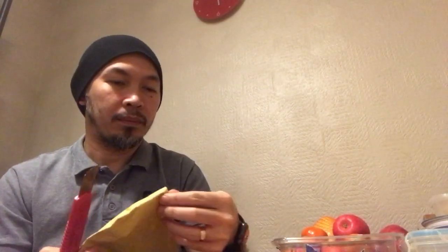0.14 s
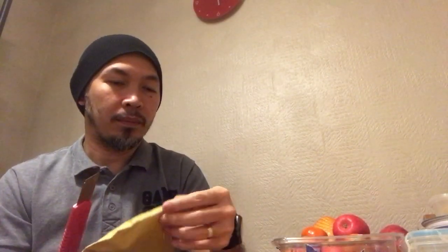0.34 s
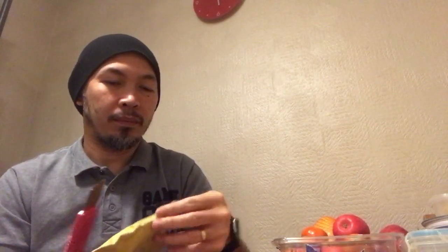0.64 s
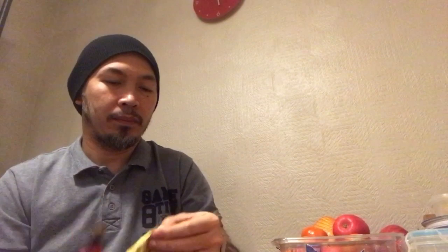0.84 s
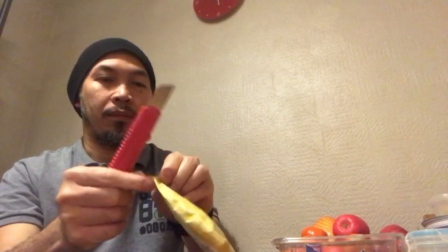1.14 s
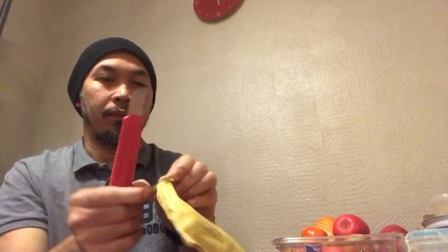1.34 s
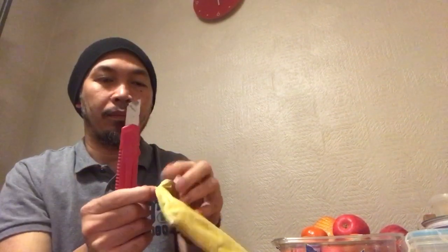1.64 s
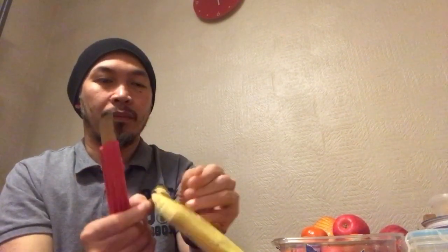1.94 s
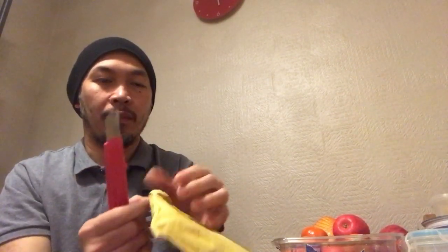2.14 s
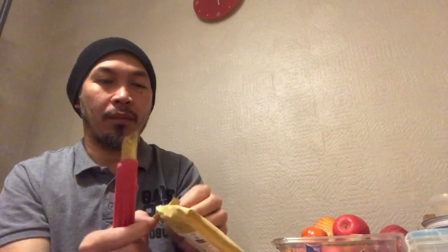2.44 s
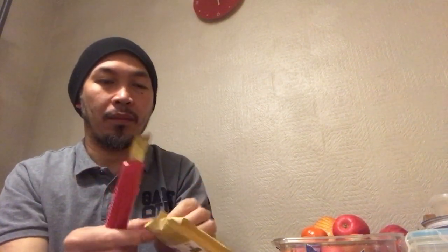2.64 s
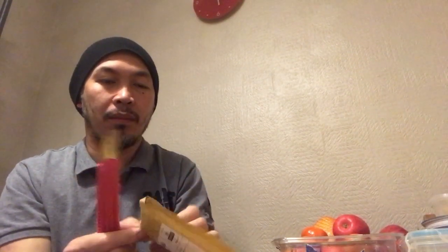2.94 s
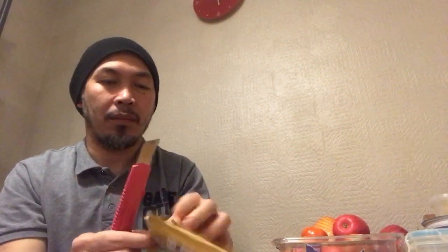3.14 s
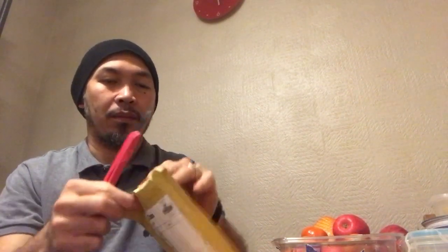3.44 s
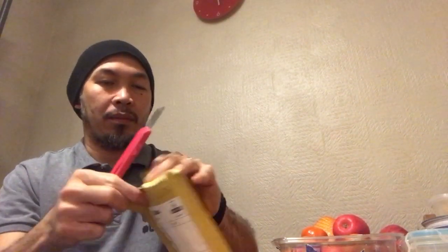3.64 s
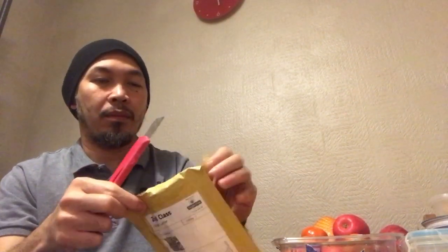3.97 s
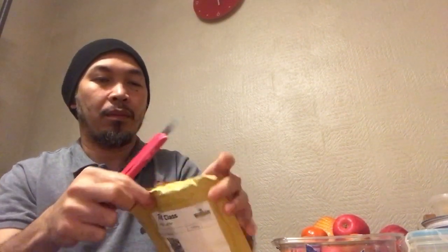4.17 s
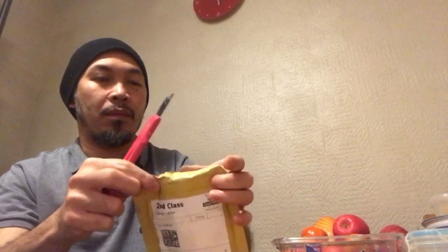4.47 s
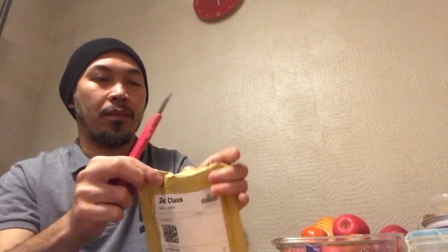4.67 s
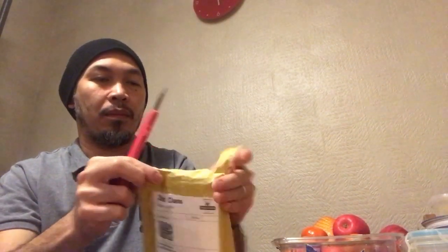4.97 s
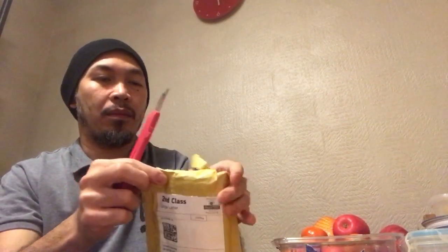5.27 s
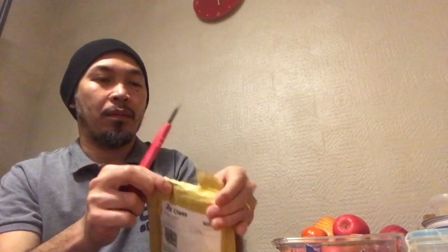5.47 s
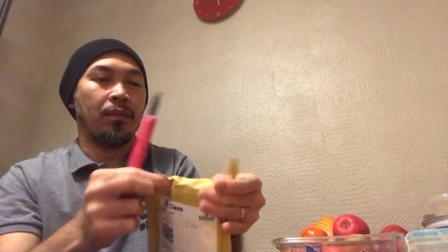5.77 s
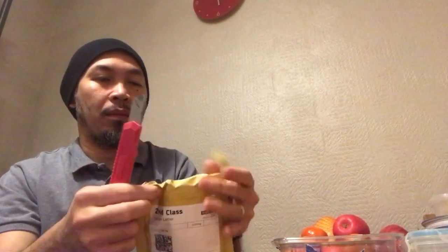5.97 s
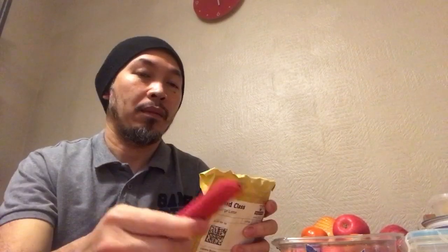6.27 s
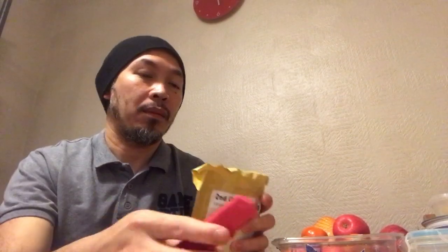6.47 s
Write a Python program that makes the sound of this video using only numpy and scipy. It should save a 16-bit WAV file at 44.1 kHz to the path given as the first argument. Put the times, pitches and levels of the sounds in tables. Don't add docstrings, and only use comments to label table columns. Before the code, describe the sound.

A padded paper envelope is handled and torn open very close to a laptop microphone in a small, quiet furnished room with a short echo and low steady hush. From 0 to 0.5 s there are light rustles and small folds, then a crisp cluster at 0.6-0.95 s. Between 1.1 and 1.45 s creases snap while plastic lining ticks very high; another bright burst comes at 1.75-1.95 s. Sparse, softer crinkles follow until duller crackling at 2.6-2.9 s and folds with table thuds at 3.1-3.4 s. The hardest tearing rips at 3.65-3.95 s, loud enough to clip. After gentler rustling, dense snaps and thumps build at 4.4-5.1 s, peaking near 4.8 s. Irregular cracks continue around 5.5 and 5.85 s. At 6.2 s everything cuts abruptly, leaving near quiet and a few light crinkles around 6.3-6.4 s.

```python
import sys
import numpy as np
from scipy import signal
from scipy.fft import rfft, irfft, next_fast_len
from scipy.io import wavfile
from scipy.ndimage import uniform_filter1d, map_coordinates

SR = 44100
rng = np.random.default_rng(int(sys.argv[2]) if len(sys.argv) > 2 else 0)


def waveform_to_disk(signal):
    frames = np.transpose(np.atleast_2d(signal))
    scaled = np.clip(frames, -1, 1) * 32767
    samples = np.round(scaled).astype(np.int16)
    wavfile.write(sys.argv[1], SR, samples)


def ratio(d):
    e = np.asarray(d, float) / 20
    return 10 ** e


N = 291573
T = np.arange(N) / SR
SCENE_CHANGE_S = 6.211

# frequency in Hz, level in dB per Hz.
HUSH_COLOUR = [(18, -43), (30, -7), (109, -2), (174, -5.5), (239, -5), (913, -16.5), (3670, -17.5),
               (3980, -23.5), (4910, -20.5), (16000, -45)]
# frequency in Hz, level in dB per Hz.
WOOD_COLOUR = [(25, -54), (45, -3.5), (80, 4.5), (130, 1.5), (250, -7.5), (500, -39)]
# frequency in Hz, level in dB per Hz.
POCKET_COLOUR = [(120, -40.5), (260, -2), (370, 5), (520, -1.5), (900, -35.5)]
# frequency in Hz, gain in dB.
MIC_RESPONSE = [(30, -53.5), (150, -24.5), (720, -3.5), (1250, 0.5), (1900, -0.5), (2300, 1), (3000, -2),
                (3900, 0), (4900, -4.5), (6400, -6), (9600, -13), (10400, -14.5), (11800, -10.5),
                (15750, -13.5)]
# frequency in Hz, t60 in seconds.
ROOM_DECAY = [(200, 0.38), (1000, 0.022), (4000, 0.08), (14000, 0.096)]
# start in seconds, hold in seconds, level in dB.
TABLE_LEANS = [
    (1.93, 0.031, -42),
    (3.14, 0.04, -44),
    (3.47, 0.18, -43.5),
    (4.42, 0.065, -54),
    (4.7, 0.36, -43.5),
    (5.2, 0.08, -62),
    (5.75, 0.034, -41.5),
]
# start in seconds, peak in dB, pitch in Hz, t60 in seconds.
TABLE_THUMPS = [(0.523, -38.5, 380, 0.15), (0.9, -22.5, 387, 0.038), (1.128, -24, 277, 0.034),
                (1.311, -24, 668, 0.079), (1.936, -22, 522, 0.043), (3.145, -20, 632, 0.089),
                (3.263, -19.5, 516, 0.048), (4.169, -20, 620, 0.073), (4.433, -30.5, 141, 0.078),
                (4.822, -5.5, 384, 0.037), (4.979, -27, 336, 0.085), (5.826, -22, 300, 0.024),
                (5.843, -20, 300, 0.029), (5.864, -15, 400, 0.028), (5.978, -18.5, 318, 0.019),
                (6.188, -25.5, 77.5, 0.071)]
# time in seconds, steady handling in dB, brightness in dB.
STEADY_HANDLING = [(0.0, -48.5, -9), (.25, -53, -9), (.55, -45.5, -8), (.8, -30.5, -5.5), (1.03, -41.5, -6),
                   (1.25, -34.5, 8), (1.5, -38.5, -6), (1.75, -42, -1.5), (2.14, -48, -9), (2.5, -35, -14),
                   (3.04, -33.5, -7.5), (3.5, -30, -21.5), (4.0, -38, -10), (4.55, -28.5, -10),
                   (5.0, -39, 5), (5.2, -38.5, -14), (5.45, -34, -7), (6.2, -35, -9.5)]
# level in dB, brightness in dB.
LATE_HANDLING = (-75, -5)
# start in seconds, hold in seconds, level in dB, brightness in dB.
SHEET_PULLS = [(.35, 0.046, -29.5, -5), (.74, 0.017, -34, -15), (1.2, 0.12, -45, 15.5),
               (1.3, 0.099, -27.5, -9), (1.8, 0.097, -22, -0.5), (1.92, 0.033, -23, -8),
               (2.29, 0.02, -33.5, -10.5), (2.46, 0.018, -33, -5.5), (2.75, 0.056, -21.5, -2.5),
               (2.875, 0.1, -24.5, -7.5), (3.69, 0.047, -8.5, -6), (3.86, 0.087, -12, -9),
               (3.855, 0.118, -38, 9), (4.62, 0.072, -19.5, -8.5), (4.73, 0.025, -17, -13.5),
               (4.94, 0.041, -18.5, -13.5), (5.04, 0.046, -33, -4.5), (5.5, 0.13, -21, -17),
               (6.335, 0.049, -34.5, -3.5), (6.24, 0.07, -52, 0), (6.47, 0.084, -47, -10),
               (.29, 0.03, -41.5, -5), (1.14, .04, -40, -12), (3.79, 0.014, -43.5, 10),
               (4.175, 0.017, -27.5, -5), (4.065, 0.05, -40.5, 5.5), (5.55, 0.054, -30, -2),
               (.02, .06, -62, 10), (.47, .04, -57, 12), (.68, .025, -60, 12), (3.74, .033, -39, 16),
               (3.93, 0.034, -39, 15), (5.36, .04, -58, 12), (5.545, .115, -50, 14), (5.74, .045, -54, 12),
               (5.945, 0.021, -56, 17), (6.0, .05, -58, 14), (6.5, .06, -66, 8), (.05, 0.11, -47.5, -7),
               (.6, 0.13, -40, -12)]
# start in seconds, hold in seconds, level in dB, brightness in dB.
PADDING_SQUEEZES = [(.588, 0.043, -36, -41), (.874, 0.055, -31, -19), (1.125, 0.056, -23.5, -30),
                    (1.553, 0.11, -30, -24), (1.635, 0.034, -87, -50), (2.212, 0.041, -34.5, -10),
                    (2.572, 0.091, -31, -21), (3.14, 0.025, -25.5, -8), (3.225, 0.084, -27.5, -13),
                    (3.378, 0.18, -36.5, -4.5), (3.645, 0.09, -12.5, -13.5), (3.72, 0.035, -17, -29),
                    (4.078, 0.083, -26.5, -24), (4.4, 0.062, -25.5, -13), (4.775, 0.01, -15, -9),
                    (4.823, 0.0057, -7, -19.5), (5.293, 0.097, -25, -12.5), (5.686, 0.0052, -18.5, -29),
                    (5.73, 0.053, -23, -11.5), (5.828, 0.017, -18, -19), (5.976, 0.089, -37, -30),
                    (6.057, 0.062, -29, -9.5), (6.188, .03, -21, -16), (6.4, 0.03, -35, -19)]
# start in seconds, peak in dB, pitch in Hz.
LINING_TICKS = [(0.748, -27, 11900), (0.754, -39, 11000), (0.835, -34, 12810), (1.0, -32, 13890),
                (1.164, -27, 13500), (1.173, -19, 10960), (1.201, -18, 12940), (1.214, -15, 10900),
                (1.224, -15, 9220), (1.233, -17, 11900), (1.252, -24, 12380), (1.256, -29, 9110),
                (1.265, -24, 9630), (1.276, -25, 9200), (1.288, -17, 12300), (1.295, -17, 12300),
                (1.306, -13, 14400), (1.326, -10, 12960), (1.349, -22, 11900), (1.369, -25, 13980),
                (1.375, -22, 11200), (1.381, -18, 12960), (1.386, -24, 12200), (1.396, -18, 11520),
                (1.401, -25, 11500), (1.41, -25, 12700), (1.417, -24, 14600), (1.812, -15, 15300),
                (1.82, -7, 15000), (1.83, -2, 14300), (1.843, -16, 12960), (1.865, -7, 11930),
                (1.882, -20, 13100), (1.941, -32, 13480), (2.666, -23, 14000), (3.234, -38, 9020),
                (3.268, -34, 8700), (3.657, -10, 11000), (3.836, -26, 13110), (4.067, -23, 9800),
                (4.09, -25, 11800), (4.131, -31, 13200), (4.175, -25, 12270), (4.183, -24, 12900),
                (4.192, -29, 14060), (4.444, -27, 11740), (4.491, -30, 12170), (4.635, -18, 9020),
                (4.643, -16, 9540), (4.737, -18, 11000), (4.79, -21, 10160), (4.823, -6.5, 9850),
                (4.847, -17, 9500), (4.957, -18, 13200), (4.98, -10, 9400), (5.005, -22, 11100),
                (6.058, -26, 9930), (6.067, -29, 11910), (6.353, -39, 11700), (6.539, -43, 8810)]
# start in seconds, peak in dB, panel pitch in Hz.
DULL_FOLDS = [(.009, -18.5, 1430), (.53, -23.5, 1090), (0.747, -3.5, 1890), (1.311, 6, 1510),
              (1.443, -13, 1610), (1.934, -6, 1300), (2.296, -16.5, 2570), (2.35, -17, 1300),
              (2.394, -14.5, 1740), (2.45, -23, 1320), (2.957, -14, 2140), (3.442, -14.5, 1410),
              (3.538, -14, 870), (4.126, -15.5, 910), (4.846, 4, 940), (4.911, -4.5, 1190),
              (4.946, -14, 1120), (5.05, -13.5, 1260), (5.229, -20, 2470), (5.499, 1.5, 1730),
              (5.524, -12, 1410), (5.534, -8.5, 4210), (5.687, -11, 2400), (5.829, -10, 1130),
              (5.845, -15.5, 1110), (5.865, -6.5, 1230), (5.976, -5.5, 1260), (6.057, -8, 1460),
              (6.089, -11.5, 1350), (6.201, -1.5, 1280)]
# start in seconds, peak in dB, panel pitch in Hz, crack in dB.
SHARP_CRACKS = [(.293, -27, 1400, -20), (0.357, -21, 1650, -21), (0.992, -16, 960, -27),
                (1.08, -17.5, 1820, -5), (1.126, -3.5, 1660, -4), (1.197, -20, 1070, -7),
                (1.35, -5.5, 1500, -20), (1.641, -8.5, 1400, -13), (1.755, -17.5, 1400, -29),
                (1.9, -1.5, 1410, -16), (3.65, -13, 1340, -19), (3.691, 5.5, 1420, -11),
                (3.718, -6, 1260, -17), (4.274, -20, 1010, -15), (4.44, -12.5, 2080, -21),
                (4.467, -10.5, 1270, -22), (4.576, -12, 1160, -9.5), (4.615, -14, 1210, -5),
                (4.65, -6, 1090, -18), (4.679, 2.5, 2250, -18.5), (4.741, -10, 1230, -20),
                (4.774, 1, 1430, -11.5), (4.792, 1, 1050, -25), (4.976, -4, 1330, -9),
                (5.075, -30.5, 1560, 9.5), (5.092, -9, 1000, -17), (5.293, -8, 3070, -12.5),
                (5.384, -26, 1570, -21), (5.547, -8, 1390, -10), (5.564, -7.5, 1260, -15)]
# start in seconds, peak in dB, panel pitch in Hz, crack in dB.
SHEET_RATTLES = [(.601, -14.5, 2420, -5), (0.754, -6, 2250, -10), (.78, -7.5, 2320, -4.5),
                 (0.784, -8, 3770, -8), (.873, -4, 2080, -2.5), (0.914, -6, 5500, -5.5),
                 (1.412, -14.5, 1860, -19), (1.554, -21, 2200, -7), (1.786, -17, 1410, -27),
                 (1.795, -3, 1740, -6), (1.827, -9.5, 1420, -7), (1.853, -4, 2400, 1.5),
                 (2.573, -20, 2050, -36), (2.658, -17.5, 1020, -18), (2.748, -14, 1080, -23),
                 (2.778, -6.5, 1640, -29), (2.873, -7.5, 1870, -36), (2.905, -7, 1650, -27),
                 (3.144, -0.5, 2520, -35), (3.224, -11.5, 1450, -40), (3.267, -8.5, 1410, -36),
                 (3.378, -20, 1700, -20), (3.453, -13, 1750, -35), (4.081, -14, 1250, -10),
                 (4.167, -15, 2300, -19), (4.496, -10.5, 2040, -5.5), (4.821, -5, 1280, -6),
                 (5.18, -27.5, 3200, -6), (5.318, -16.5, 1220, -29), (6.333, -11, 2400, -3)]
# start in seconds, peak in dB, panel pitch in Hz, crack in dB.
SMALL_TICKS = [(0.013, -19.5, 2650, -28), (0.586, -24, 3970, -21), (0.727, -27, 1250, -2),
               (.835, -27, 3970, -6), (1.004, -25, 2540, -17), (1.116, -12.5, 1780, -26),
               (1.287, -24, 1100, -15), (1.528, -42, 2160, -19), (1.821, -7, 1450, -22),
               (1.866, -5.5, 1480, -12), (2.162, -36, 1520, -19), (2.725, -13.5, 1150, -13),
               (3.099, -19, 1440, -26), (3.137, -5.5, 2380, -31), (3.153, -10, 1980, -25),
               (3.339, -16, 1980, -18), (3.674, -7, 1230, -18), (3.852, -35, 1300, -17),
               (3.886, -10, 1260, -37), (4.039, -20, 2220, -15), (5.042, -17.5, 1180, -24),
               (5.478, -11, 1070, -33), (5.621, -17, 1390, -18), (5.733, -21, 1350, -24),
               (6.189, -21, 1030, -26), (6.291, -27, 2700, -13), (6.312, -24, 2340, -13),
               (6.353, -13, 2290, -5), (6.372, -15.5, 2550, -34), (6.393, -22, 2370, -26)]
# start in seconds, peak in dB, panel pitch in Hz.
LESSER_CREASES = [(0.645, -38, 1800), (0.856, -27, 1460), (0.9, -12.5, 1030), (0.94, -21, 1270),
                  (1.164, -17, 970), (1.168, -12.5, 1980), (1.223, -15, 2480), (1.265, -19, 2540),
                  (1.289, -15, 1050), (1.315, -12, 1560), (1.325, -11.5, 1210), (1.799, -2.5, 2600),
                  (1.815, -25, 1810), (1.841, -5, 1320), (1.875, -7, 1410), (1.881, -6, 2640),
                  (1.891, -20, 1050), (1.95, -15, 1320), (3.204, -14, 6100), (3.233, -16, 1380),
                  (3.274, -14, 2500), (3.685, -17, 1100), (3.698, -2, 1370), (3.705, -5, 1170),
                  (3.714, 3, 1510), (3.72, 1, 1400), (3.728, -10, 1440), (3.743, -18, 1300),
                  (3.877, -1.5, 1300), (3.904, -5, 1190), (3.931, -5, 1570), (3.95, -12, 1160),
                  (3.955, -2.5, 2530), (4.418, -21, 2980), (4.49, -10, 1250), (4.621, -19, 1120),
                  (4.634, -8, 1070), (4.644, -18, 1190), (4.668, -18, 2200), (4.684, -15, 2300),
                  (4.743, -12, 1240), (4.823, 6.5, 2340), (4.827, 0, 1520), (4.836, -6, 1340),
                  (4.956, -12, 1190), (4.981, -8.5, 2200), (6.006, -20, 1530), (6.049, -19, 2120),
                  (6.067, -14.5, 1220), (6.242, -33, 2240), (6.274, -28, 2780)]

RISE_DB_PER_S, SQUEEZE_RISE_DB_PER_S = 729, 2500
PULL_FALL_DB_PER_S, SQUEEZE_FALL_DB_PER_S, LEAN_FALL_DB_PER_S = 503, 340, 112
SETTLE_S = 0.19
SHEET_OVER_BODY_DB = 3
SHEET_FOLLOWS = 0.37
SHEET_SAGS = 0.18
LINING_STOPS = 0.2
FOLD_CRACK_DB, CREASE_CRACK_DB = -55, -30
FOLD_RATTLE_DB, CRACK_RATTLE_DB, FULL_RATTLE_DB = -17.5, -19, -2
TICK_RATTLE_DB, CREASE_RATTLE_DB = -12.5, -22.5


def unit(x):
    return x / np.sqrt(np.mean(x ** 2) + 1e-20)


def along(points, hz):
    f, v = np.transpose(points)
    return np.interp(np.log(hz + 1), np.log(f + 1), v)


def curves(rows):
    s, *cols = np.transpose(rows)
    return [np.interp(T, s, c) for c in cols]


def columns(rows):
    return [c[:, None] for c in np.transpose(rows)]


def wobble(rate):
    return map_coordinates(rng.standard_normal(size=600), [T * rate])


def filtered(x, order, hz, kind):
    return signal.lfilter(*signal.butter(order, hz, kind, fs=SR), x)


def coloured(x, points):
    m = 2 * next_fast_len(N // 2 + 4096)
    cep = irfft(np.log(ratio(along(points, np.fft.rfftfreq(m, 1 / SR)))), m)
    cep[1:m // 2] *= 2
    cep[m // 2 + 1:] = 0
    return irfft(rfft(x, m) * np.exp(rfft(cep)), m)[:N]


def placed(starts, waves):
    at = np.round(starts * SR).astype(int)[:, None] + np.arange(waves.shape[1])
    kept = (at < SCENE_CHANGE_S * SR) | (starts[:, None] > SCENE_CHANGE_S)
    return np.bincount(at.ravel(), (waves * kept).ravel(), N + waves.shape[1] + 1)[:N]


def swells(rows, rise, fall):
    s, hold, db, *more = columns(rows)
    t = T[::32]
    after = np.maximum(t - s - hold, 0)
    level = db - np.maximum(s - t, 0) * rise - fall * after / np.sqrt(1 + after / SETTLE_S)
    same_scene = (t < SCENE_CHANGE_S) == (s < SCENE_CHANGE_S)
    return np.where(same_scene, level, -200), *more


def summed(levels_db):
    power = np.sum(ratio(levels_db) ** 2, axis=0)
    return np.interp(T, T[::32], 10 * np.log10(power + 1e-20))


def hands():
    late = np.array(LATE_HANDLING)[:, None]
    rest = np.where(T < SCENE_CHANGE_S, curves(STEADY_HANDLING), late)[:, None, ::32]
    pulls = swells(SHEET_PULLS, RISE_DB_PER_S, PULL_FALL_DB_PER_S)
    squeezes = swells(PADDING_SQUEEZES, SQUEEZE_RISE_DB_PER_S, SQUEEZE_FALL_DB_PER_S)
    layers = []
    for (db, bright_db), stops in [(rest, 0), (pulls, LINING_STOPS), (squeezes, 0)]:
        sag_db = SHEET_SAGS * np.maximum(db + 28, 0)
        sheet_db = db + SHEET_OVER_BODY_DB + SHEET_FOLLOWS * np.minimum(bright_db, 0) - sag_db
        fizz_db = db + bright_db + stops * (db - db.max(axis=1, keepdims=True))
        layers.append((db, sheet_db, fizz_db))
    return [summed(np.vstack(layer)) for layer in zip(*layers)]


def room_hush():
    return ratio(-51) * unit(coloured(rng.standard_normal(N), HUSH_COLOUR))


def table_rumble():
    leans, = swells(TABLE_LEANS, RISE_DB_PER_S, LEAN_FALL_DB_PER_S)
    at_rest = np.full_like(leans[:1], -54)
    weight_db = summed(np.vstack([leans, at_rest]))
    return ratio(weight_db - 2.5 + 4.4 * wobble(24)) * unit(coloured(rng.standard_normal(N), WOOD_COLOUR))


def air_puffs():
    grip_db = hands()[0]
    smoothed_db = np.where(T < SCENE_CHANGE_S, uniform_filter1d(grip_db, 880), grip_db)
    pocket_db = -48 + 0.45 * (smoothed_db + 34)
    return ratio(pocket_db - 4.0 + 3.5 * wobble(30)) * unit(coloured(rng.standard_normal(N), POCKET_COLOUR))


def table_thumps():
    s, db, hz, t60 = columns(TABLE_THUMPS)
    t = np.arange(3000) / SR
    drift = np.cumsum(rng.standard_normal((len(s), len(t))), axis=1) * hz / 3200
    envelope = ratio(db + 3.0 - 60 * t / t60) * (1 - np.exp(-t / 0.0029))
    thump = envelope * np.sin(2 * np.pi * hz * t + drift)
    return filtered(placed(s[:, 0], thump), 2, 55, "high")


def lining_ticks():
    s, db, hz = columns(LINING_TICKS)
    t = np.arange(300) / SR
    drift = np.cumsum(rng.standard_normal((len(s), len(t))), axis=1) * 0.38
    envelope = ratio(db + 16 - 60 * t / 0.0036) * (1 - np.exp(-t / 0.00021))
    return placed(s[:, 0] + 0.00054, envelope * np.sin(2 * np.pi * hz * t + drift))


def crackle(count, size, hz, spread, cycles, uneven_db, clump_db, rub):
    u, g = rng.random((count, 3)), rng.standard_normal((count, 1))
    pitch = np.clip(hz * np.exp(spread * g), 150, 16000)
    strength = ratio(-uneven_db * np.log(1 - u[:, 1:2] * .995)) * np.sign(u[:, 2:] - .5)
    phase = pitch * np.arange(size) / SR
    rings = strength * np.sin(2 * np.pi * phase) * np.exp(-phase / cycles)
    grains = unit(placed(u[:, 0] * N / SR, rings))
    m = next_fast_len(N)
    scatter = np.exp(2j * np.pi * rng.random(m // 2 + 1))
    colour = uniform_filter1d(np.abs(rfft(grains, m)), size=400)
    rubbing = unit(irfft(colour * scatter, m)[:N])
    return np.sqrt(1 - rub) * grains + np.sqrt(rub) * rubbing * ratio(clump_db * wobble(60))


def patchy(x, depth_db):
    z = signal.stft(x, nperseg=256)[2]
    field = uniform_filter1d(rng.standard_normal(z.shape), size=4, axis=0)
    field = uniform_filter1d(field, size=10, axis=1)
    return signal.istft(z * ratio(depth_db * unit(field)), nperseg=256)[1][:N]


def paper_crackle():
    body_db, sheet_db, fizz_db = hands()
    clump = wobble(34) * np.clip(-(body_db + 14) / 18, .15, 1)
    body = crackle(count=4000, size=200, hz=1250, spread=.22, cycles=3.4, uneven_db=2.8, clump_db=2.4, rub=.25)
    sheet = crackle(count=7000, size=100, hz=3560, spread=0.45, cycles=1.07, uneven_db=2.5, clump_db=1.5, rub=.2)
    fizz = crackle(count=14000, size=40, hz=11500, spread=0.61, cycles=0.4, uneven_db=4.0, clump_db=0.5, rub=0.7)
    fizz = unit(filtered(fizz, 3, 7200, "high"))
    crumple = ratio(body_db - 9.5 + 4.1 * clump) * body
    crumple += ratio(sheet_db - 4.0 + 1.8 * clump) * sheet
    crumple += ratio(fizz_db + 3.0 + 4 * clump) * fizz
    before = T < SCENE_CHANGE_S
    return np.where(before, patchy(crumple * before, depth_db=2.0), crumple)


def crease_snaps():
    rows = [(*row, FOLD_CRACK_DB, FOLD_RATTLE_DB) for row in DULL_FOLDS]
    rows += [(*row, CRACK_RATTLE_DB) for row in SHARP_CRACKS]
    rows += [(*row, FULL_RATTLE_DB) for row in SHEET_RATTLES]
    rows += [(*row, TICK_RATTLE_DB) for row in SMALL_TICKS]
    rows += [(*row, CREASE_CRACK_DB, CREASE_RATTLE_DB) for row in LESSER_CREASES]
    s, db, hz, crack_db, rattle_db = columns(rows)
    t = np.arange(1300) / SR
    t60 = np.clip(0.0095 * (1300 / hz) ** 0.055, .003, .05)
    bend, shake, split = np.moveaxis(rng.standard_normal((len(s), 3, len(t))), 1, 0)

    drift = np.cumsum(bend, axis=1) * 0.27
    panel = ratio(db + 3.0 - 60 * t / t60) * (1 - np.exp(-t / .0004)) * np.sin(2 * np.pi * hz * t + drift)

    sheet = filtered(shake, 2, [2200, 7000], "band")
    rattle = ratio(db + rattle_db + 13.5 - 60 * t / (0.92 * t60)) * (1 - np.exp(-t / 0.0007)) * sheet

    edge = filtered(split, 3, 7000, "high")
    crack = ratio(db + crack_db + 16.5 - 60 * t / (0.69 * t60)) * (1 - np.exp(-t / 0.00041)) * edge

    age = t / 0.0014
    push_db = db - 13 - .5 * (rattle_db - FOLD_RATTLE_DB)
    push = ratio(push_db) * (1 - age / 2) * age * np.exp(1 - age)
    return placed(s[:, 0] + 0.000958, panel + rattle + crack + push)


def room_echo(x):
    out, cut = np.zeros(N + SR), round(SCENE_CHANGE_S * SR)
    edges = np.r_[np.linspace(0, cut, 24).astype(int), N]
    for a, b in zip(edges[:-1], edges[1:]):
        hz, t, z = signal.stft(rng.standard_normal(SR // 4), SR, nperseg=128)
        decay = ratio(-60 * t / along(ROOM_DECAY, hz)[:, None])
        tail = signal.istft(z * decay, SR, nperseg=128)[1]
        wet = signal.fftconvolve(x[a:b], tail / np.linalg.norm(tail))
        if a == cut:
            out[cut:] = 0
        out[a + 90:][:len(wet)] += wet
    return out[:N]


def microphone(x):
    size = next_fast_len(N)
    slope = np.clip((15800 - np.fft.rfftfreq(size, 1 / SR)) / 200, 0, 1) ** 2
    return irfft(rfft(coloured(x, MIC_RESPONSE), size) * slope, size)[:N]


def scene():
    background = room_hush() + table_rumble() + air_puffs() + table_thumps()
    envelope = lining_ticks() + paper_crackle() + crease_snaps()
    heard = microphone(envelope + ratio(-6.0) * room_echo(envelope))
    return (background + heard)[None]


def low_pass(x):
    return signal.sosfilt(signal.butter(12, 16390, fs=SR, output="sos"), x)


def record(dry):
    clipped = dry / (1 + np.abs(dry / .99) ** 12) ** (1 / 12)
    return low_pass(clipped)


dry = scene()
out = record(dry)
waveform_to_disk(out)
```